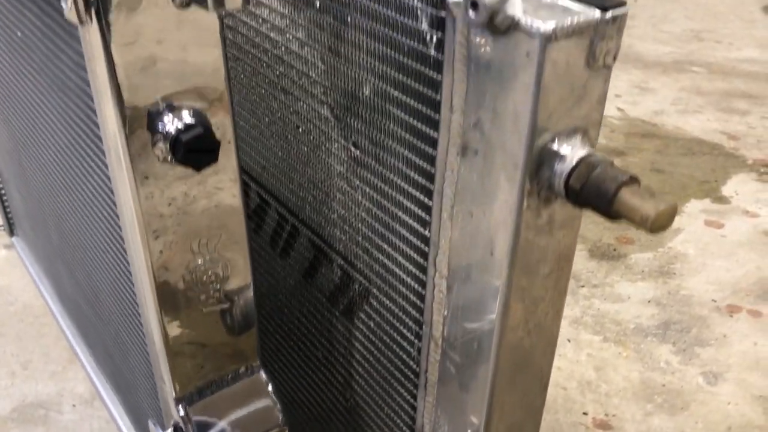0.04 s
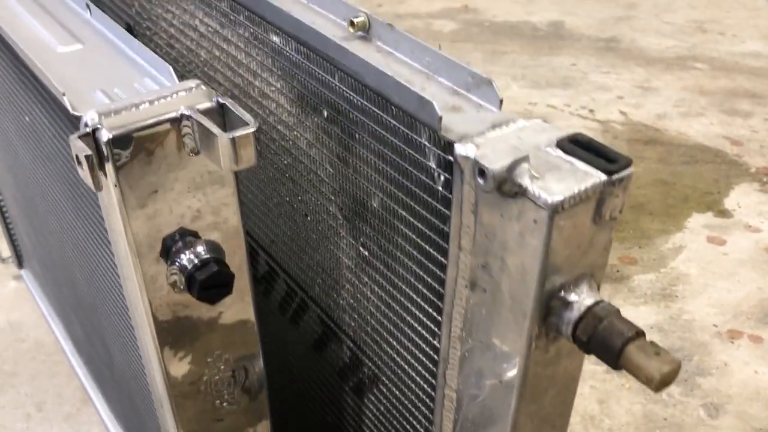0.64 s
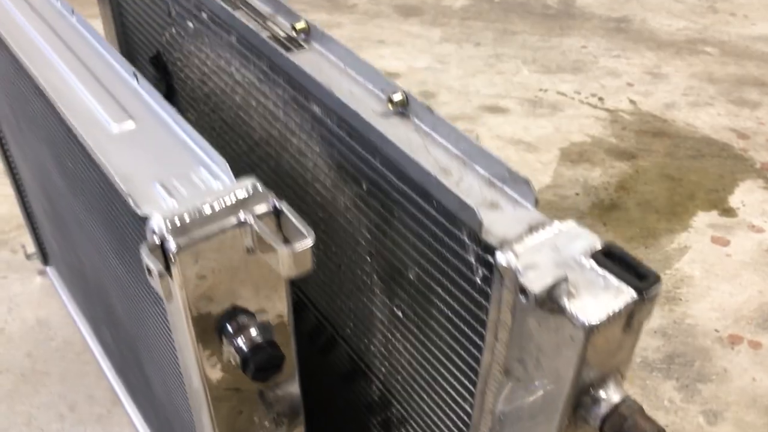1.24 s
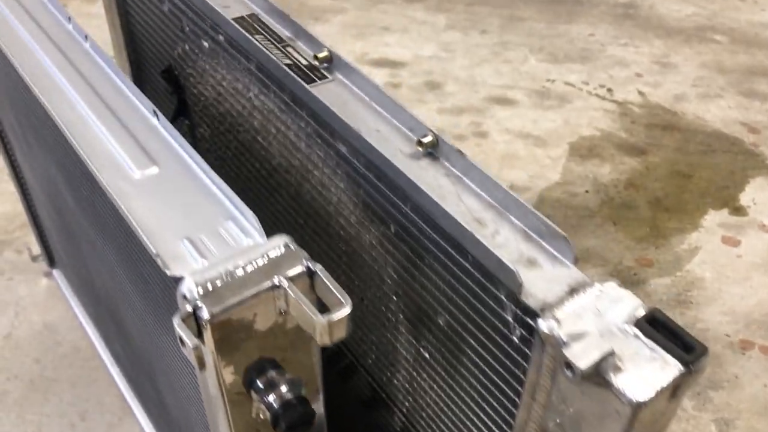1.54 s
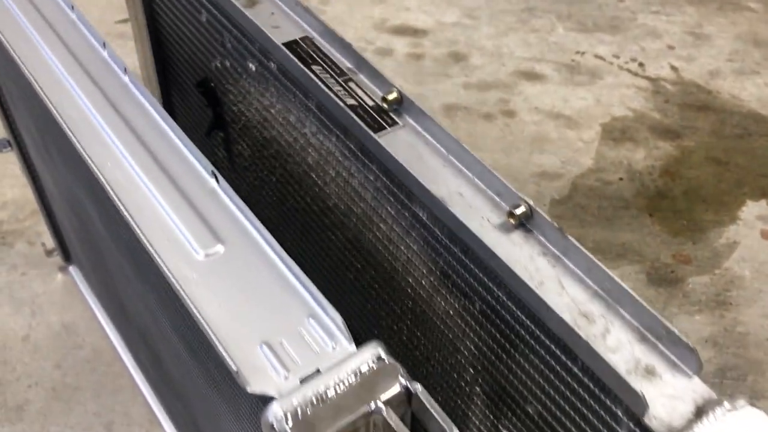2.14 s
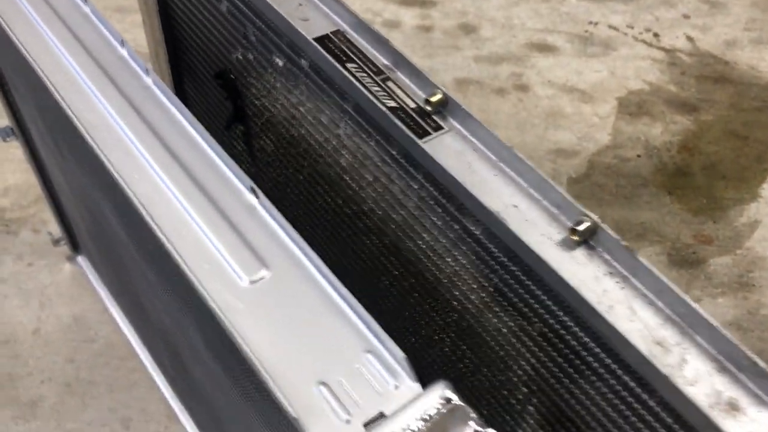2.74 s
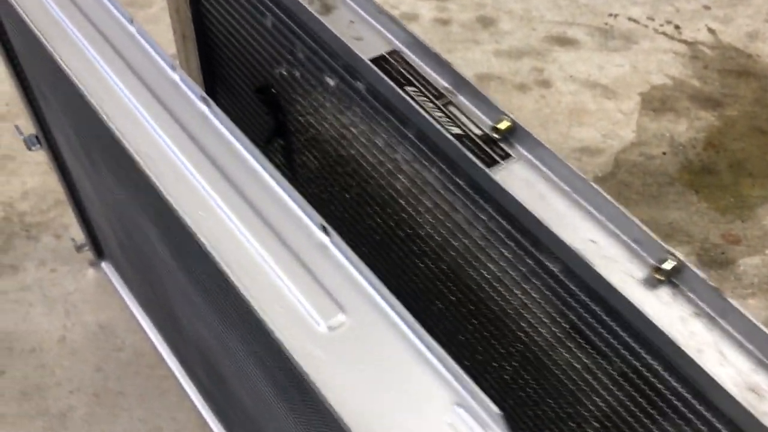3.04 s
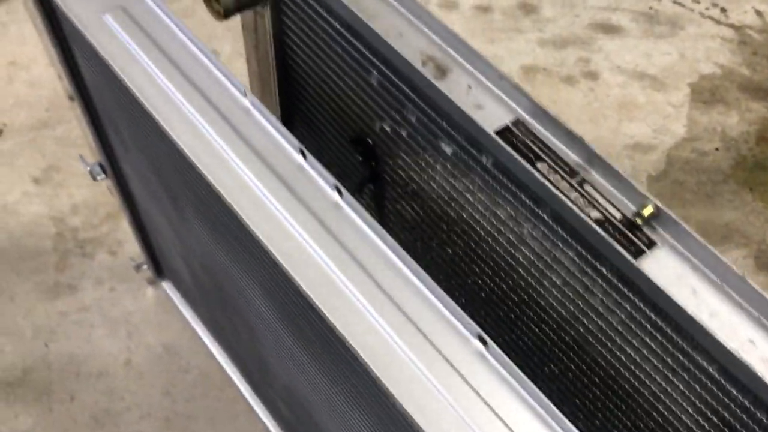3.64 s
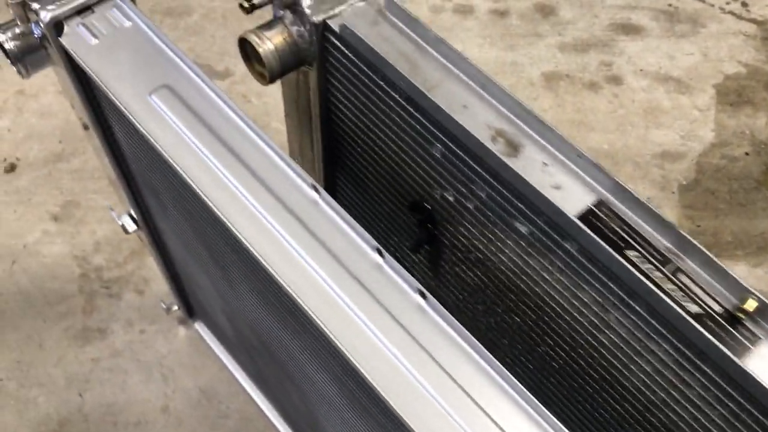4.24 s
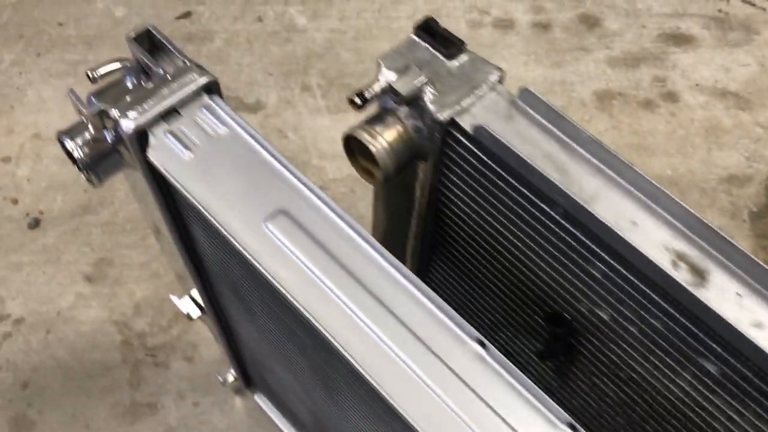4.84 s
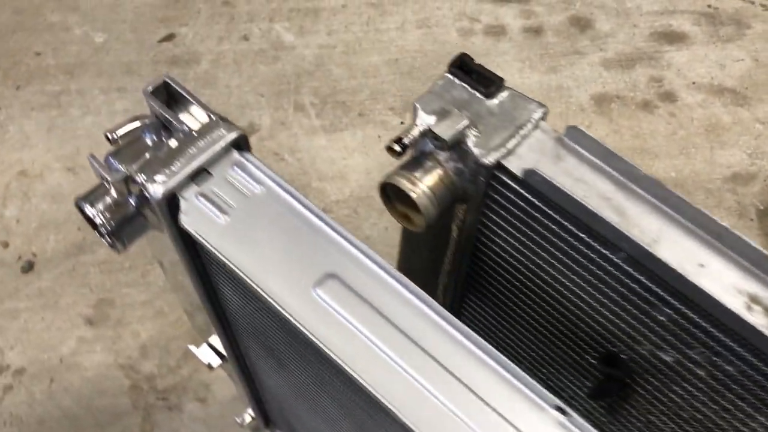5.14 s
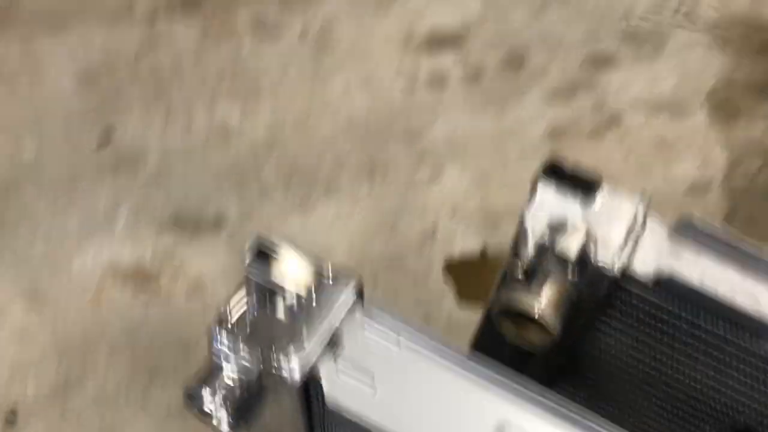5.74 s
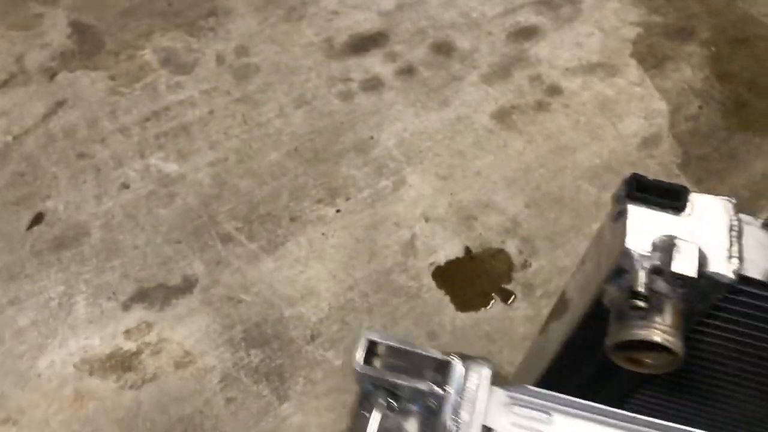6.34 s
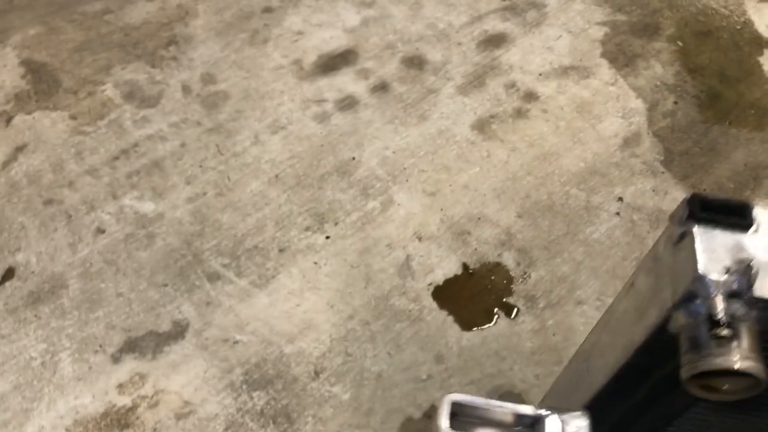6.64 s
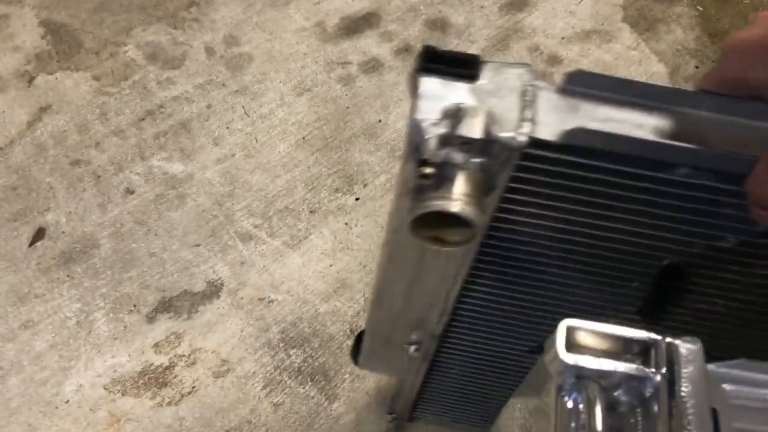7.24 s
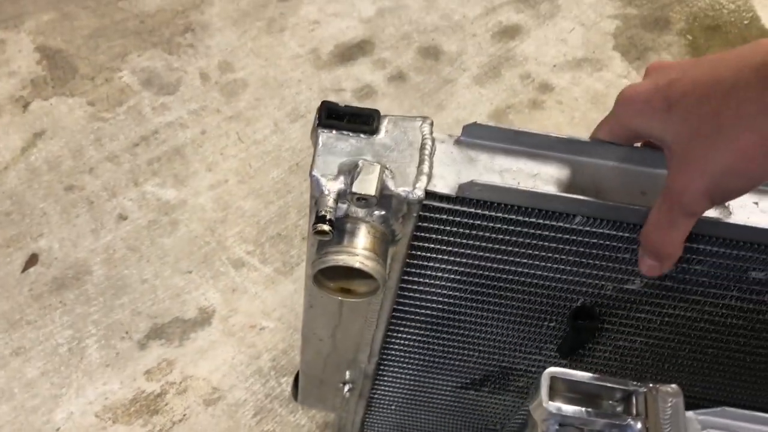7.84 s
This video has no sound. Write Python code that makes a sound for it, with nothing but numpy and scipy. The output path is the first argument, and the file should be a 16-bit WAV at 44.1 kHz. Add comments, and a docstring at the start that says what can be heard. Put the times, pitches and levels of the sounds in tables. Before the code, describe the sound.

A quiet garage with soft air noise, a faint low hum and a short echo, heard from close by. From the start, slow steps rub and scuff lightly on gritty concrete, and single grains of sand crack underfoot in sharp, irregular ticks. A clearer scuff comes at about 1.5 seconds, a few soft, dull taps around 2.8 and 3.2, and the sharpest snap near 4. The shuffling gets busier from 4.4 seconds, and at 5.8 a heel lands with a dull thud, a gritty skid and a slight microphone rumble. At about 6.4 a light nudge draws a faint note from an aluminium radiator. From 6.8 it is dragged over the concrete in a louder, grinding scrape that sticks and slips, with a hollow metallic ring, strongest around 7 to 7.3. It settles with a low shudder from 7.5 and fades by 7.9 seconds.

```python
"""A bare garage with a gritty concrete floor. Someone steps slowly around two aluminium radiators.
Soles rub and scuff, single grains of sand crack under them, and the room answers each sound.
Then one radiator is dragged: its edge sticks and slips on the concrete, which makes its tanks and
its core (the finned middle) ring, and it settles with a low shudder."""
import sys
import numpy as np
from scipy import signal
from scipy.fft import rfft, irfft, next_fast_len
from scipy.io import wavfile
from scipy.ndimage import uniform_filter1d

SR = 44100
rng = np.random.default_rng(int(sys.argv[2]) if len(sys.argv) > 2 else 0)


def transcribe(signal):
    """Save signal, clipped to [-1, 1], as a 16-bit WAV file at the path in sys.argv[1]."""
    frames = np.atleast_2d(signal).T
    limited = np.clip(frames, -1, 1)
    pcm = np.round(limited * 32767).astype(np.int16)
    wavfile.write(sys.argv[1], SR, pcm)


N = 347508

# which part of the radiator rings in which range of pitch
PANEL_HZ, CORE_HZ, TANK_HZ, RIM_HZ = (0, 330), (330, 1000), (1000, 2500), (2500, SR / 2)

# the edge digs into the concrete: t/s, length/s, level/dB
EDGE_BITES = [(6.95, 0.033, -33), (7.06, .15, -43.5), (7.24, .19, -45), (7.515, 0.037, -43),
              (7.61, 0.026, -49.5), (7.69, 0.026, -49)]
# tone of the grinding edge: f/Hz, level/dB
GRIND_TONE = [(300, -15), (900, 3.5), (1500, -0.5), (2700, 5.5), (4200, 3), (5000, -6), (6500, -1),
              (7800, -11.5), (10500, -16.5), (14000, -15), (16000, -22)]
def radiator():
    """The edge sticks and slips, grinding the concrete and shaking the core, tanks and rim."""
    friction = even(grains(per_s=2500, spread_db=2.5, clump_db=1.5, clumps_per_s=160), span_s=0.035)
    dig, = pushes(EDGE_BITES, attack_s=0.0064, release_s=0.03)
    jolts = slips()
    nudge = swell(start=6.41, length=0.1, attack_s=0.038, release_s=0.038)
    core = core_ring(friction, nudge)
    tanks = tank_ring(friction, dig, jolts)
    # the first light push makes one note of a tank sing
    note = resonate(resonate(friction, hz=1090, width_hz=7.3), hz=1090, width_hz=22)
    sing = from_db(-57) * nudge * even(note, span_s=0.03)
    bite = dragging(-15) + dig + jolts
    rim = from_db(-13) * through(bite * friction, ringing(RIM_HZ))
    edge = bite * colour(friction, GRIND_TONE) + rim
    echo = from_db(-7.5) * garage(edge + from_db(-12.5) * tanks)
    return core + tanks + sing + edge + echo


# speed of the drag, given as how loud it rubs: t/s, level/dB
DRAG_SPEED = [(6.72, -74), (6.76, -42.5), (6.84, -32.5), (7.04, -32.5), (7.16, -27.5), (7.25, -33),
              (7.42, -37.5), (7.73, -48.5), (7.79, -63.5), (7.88, -71)]
def dragging(offset_db):
    """A faster drag is louder: a volume curve that follows the speed, shifted by offset_db."""
    return from_db(offset_db + np.interp(np.arange(N) / SR, *np.transpose(DRAG_SPEED), left=-np.inf))


# the edge catches and breaks free: t/s, relative level/dB
EDGE_SLIPS = [(6.419, -29.5), (6.832, -28), (6.878, -36), (7.069, -41), (7.095, -17), (7.155, -22),
              (7.347, -24), (7.358, -33), (7.516, -24), (7.537, -19), (7.613, -20)]
def slips(attack_s=0.0024, decay_s=0.004):
    """Each slip is a short surge of friction; returns their volume curve."""
    out, t = np.zeros(N), np.arange(SR // 10) / SR
    for start, db in EDGE_SLIPS:
        add(out, start, from_db(db - 14) * np.minimum(t / attack_s, 1) * np.exp(-t / decay_s))
    return out


def core_ring(friction, nudge, lower_at_s=7.056, lowering_s=0.58, lifted_db=-13):
    """As the radiator is lowered, its weight moves the shaking into the core."""
    load = np.clip((np.arange(N) / SR - lower_at_s) / lowering_s, 0, 1)
    flex = dragging(lifted_db * (1 - load)) + from_db(-62) * nudge
    return flex * even(sliding_notes(friction, CORE_HZ, wander_per_s=9), span_s=0.055)


def tank_ring(friction, dig, jolts):
    """The hollow tanks ring as the edge slides and digs, and ring on after each slip."""
    drive = from_db(-1.5) * (dragging(0) + from_db(-5) * dig)
    notes = sliding_notes(friction, TANK_HZ, wander_per_s=14)
    # the many weak notes between the strong ones blur into a rasp
    rasp = rms_one(resonate(above(friction, hz=1050), hz=1650, width_hz=1800))
    clangs = from_db(-2) * through(friction * jolts, ringing(TANK_HZ))
    return drive * even(notes + from_db(-21) * rasp, span_s=0.041) + clangs


# the radiator's natural notes (narrow ones ring longer): f/Hz, width/Hz, level/dB
METAL_NOTES = [(168, 14, -13), (211, 14, -7), (268, 20, -15), (372, 20, -10.5), (537, 12, -3),
               (562, 12, -4.5), (625, 24, -7), (665, 14, -4), (840, 20, -17), (910, 20, -18),
               (1098, 15, 2.5), (1135, 22, -6), (1210, 26, 2.5), (1394, 20, -1), (1530, 45, -10),
               (1640, 22, 1), (1745, 15, -1), (1792, 30, -5), (1846, 15, -7), (1949, 15, -4),
               (2195, 17, -6), (2320, 25, -12), (2817, 32, -8), (3090, 40, -13), (3456, 22, -10),
               (4180, 50, -14), (5650, 400, -23)]
def sliding_notes(friction, band, wander_per_s, wander_db=3.5):
    """As the contact slides along the edge, each note is driven now more, now less."""
    return rms_one(sum((-1) ** k * from_db(db + wander_db * drift(wander_per_s))
                       * resonate(friction, hz, width)
                       for k, (hz, width, db) in enumerate(METAL_NOTES) if band[0] <= hz < band[1]))


def ringing(band):
    """How the notes in one range of pitch die away after a single knock."""
    t = np.arange(SR // 2) / SR
    return sum((-1) ** k * from_db(db) * width * np.exp(-np.pi * width * t) * np.sin(2 * np.pi * hz * t)
               for k, (hz, width, db) in enumerate(METAL_NOTES) if band[0] <= hz < band[1])


# the radiator rocks on its feet: t/s, length/s, boom level/dB, drone level/dB
BODY_ROCKS = [(6.95, 0.025, -60, -52), (7.28, 0.091, -55, -58), (7.38, 0.084, -71, -51),
              (7.51, 0.035, -49, -43.5), (7.585, 0.056, -45, -43.5), (7.67, 0.15, -49, -56)]
# tone of a deep boom: f/Hz, level/dB
BOOM_TONE = [(30, -14), (42, -25), (53, 13), (66, -5), (95, 2), (120, -9.5)]
def shudder():
    """The whole body booms and its broad panels drone as it slides and rocks."""
    boom, drone = pushes(BODY_ROCKS, attack_s=0.015, release_s=0.029)
    body = even(colour(rng.standard_normal(N), BOOM_TONE), span_s=0.11)
    panels = even(through(rng.standard_normal(N), ringing(PANEL_HZ)), span_s=0.054)
    return (boom + dragging(-26)) * body + (drone + dragging(-24.5)) * panels


# a sole rubs the floor: t/s, length/s, relative grit level/dB, relative sand level/dB
SOLE_RUBS = [(.15, 0.09, -86, -72), (.3, 0.13, -78, -70), (.66, 0.14, -68.5, -73), (.98, .1, -69, -58.5),
             (1.07, 0.055, -60, -55.5), (1.49, 0.29, -59, -64), (1.75, 0.25, -71, -73),
             (2.24, 0.092, -75.5, -73.5), (2.46, 0.083, -66, -63.5), (2.98, 0.061, -69, -59),
             (3.04, 0.084, -60.5, -57.5), (3.16, 0.36, -62, -64.5), (3.52, .1, -62.5, -61),
             (3.62, 0.18, -61.5, -53), (3.82, 0.075, -72, -73), (4.4, 0.21, -56.5, -60),
             (4.62, 0.21, -54, -58.5), (5.09, 0.25, -69.5, -66), (5.33, .11, -55, -56.5),
             (5.5, .14, -57.5, -63.5), (5.65, 0.19, -54, -50), (5.77, 0.22, -55, -56),
             (6.27, 0.14, -56.5, -59.5), (6.41, 0.14, -51, -60.5), (6.58, 0.095, -59.5, -65.5),
             (6.68, 0.1, -59, -56.5)]
# tone of coarse grit: f/Hz, level/dB
GRIT_TONE = [(200, 0), (400, -7.5), (600, -1.5), (850, -3), (1300, -2), (2500, 0.5), (3800, -1),
             (5000, -7.5), (7000, -11.5)]
# tone of fine sand: f/Hz, level/dB
SAND_TONE = [(4200, -2), (6300, -3.5), (8800, -3), (10400, -9), (12500, -6.5), (14500, -8.5),
             (16000, -14.5)]
def soles():
    """Coarse grit rolls under the soles while fine sand hisses; now and then a grain ticks alone."""
    grit, sand = pushes(SOLE_RUBS, attack_s=0.026, release_s=0.046)
    grit, sand = grit + from_db(-72.5), sand + from_db(-73.5)   # the feet are never quite still
    coarse = colour(grains(per_s=3000, spread_db=5.5, clump_db=2.5, clumps_per_s=130), GRIT_TONE)
    fine = colour(grains(per_s=6000, spread_db=6, clump_db=1.5, clumps_per_s=220), SAND_TONE)
    ticks = 0
    for hz in np.geomspace(1500, 11000, 4):
        strays = grains(per_s=22, spread_db=-5, clump_db=1, clumps_per_s=12)
        ticks += rms_one(resonate(strays, hz, 0.17 * hz))
    crunch = even(coarse, span_s=0.062) + from_db(-13) * ticks
    return from_db(-3.5) * (grit * crunch + sand * even(fine, span_s=0.047))


# short skids of a sole: t/s, length/s, level/dB, strongest f/Hz
SOLE_SKIDS = [(0.165, 0.02, -61, 7000), (0.394, 0.017, -61.5, 3720), (1.105, 0.018, -48, 4000),
              (1.479, 0.011, -47, 3200), (1.485, 0.0095, -41, 1910), (1.502, 0.019, -44.5, 5500),
              (2.975, 0.0075, -52, 7000), (3.44, 0.027, -53.5, 2140), (4.398, 0.0063, -49, 2880),
              (4.489, 0.03, -47.5, 5140), (5.255, 0.0038, -40.5, 2600), (5.265, 0.046, -52, 2760),
              (5.768, 0.021, -42.5, 7000), (5.789, 0.1, -46.5, 2900), (5.914, 0.022, -47, 9000),
              (6.264, 0.026, -49, 10000), (6.948, 0.075, -35, 4170)]
def skids(attack_s=0.0028, release_s=0.0064):
    """A sole slides briefly and crushes many grains at once."""
    out, t = np.zeros(N), np.arange(SR // 6) / SR
    crush = above(grains(per_s=12000, spread_db=3.5, clump_db=12.5, clumps_per_s=190), hz=534)
    for start, length, db, hz in SOLE_SKIDS:
        grit, width = crush[round(start * SR):][:len(t)], 1.7 * hz
        pressure = np.minimum(t / attack_s, 1) * np.exp(-np.maximum(t - length, 0) / release_s)
        rasp = resonate(resonate(grit, hz, width), hz, 2 * width)
        add(out, start, from_db(db) * pressure * even(rasp + from_db(-18) * grit, span_s=0.0079))
    return out


# larger sand grains crack: t/s, peak level/dB, f/Hz, width as a share of f
SAND_CRACKS = [(.108, -44, 3820, .5), (.655, -42.5, 5370, .6), (.69, -51, 1450, 0.37),
               (.969, -35, 3500, 0.59), (1.02, -36, 4630, 0.6), (1.211, -35, 7500, .65),
               (1.277, -39, 3500, 4.4), (1.426, -50.5, 1530, 0.11), (1.519, -29, 6500, 0.61),
               (1.692, -31.5, 4300, .8), (1.7177, -32, 2500, 1.2), (1.743, -36.5, 2780, 1),
               (1.833, -35.5, 3170, 0.41), (1.86, -27.5, 3600, .65), (1.968, -34.5, 2840, .8),
               (2.142, -24, 3600, 0.82), (2.264, -38.5, 2980, .8), (2.439, -38.5, 4080, .5),
               (2.4819, -29, 4020, 0.71), (2.703, -42.5, 4200, 0.59), (3.095, -32.5, 3730, 3.9),
               (3.142, -31.5, 2000, 4), (3.314, -27.5, 3020, 5), (3.383, -38, 1650, 1.7),
               (3.395, -40, 1560, 0.95), (3.428, -37.5, 4020, .5), (3.46, -24.5, 2800, 1.9),
               (3.689, -25, 3100, 0.91), (3.816, -37, 3550, 0.37), (3.894, -38, 3500, 0.73),
               (3.967, -18.5, 6070, 0.43), (4.279, -46.5, 3420, .12), (4.732, -27, 3160, 1.5),
               (4.78, -31.5, 2920, .5), (4.822, -28.5, 3170, 0.46), (5.039, -36, 5000, 2.2),
               (5.055, -42.5, 2960, .11), (5.075, -38, 3580, .5), (5.113, -35, 3050, 0.26),
               (5.435, -34, 5400, 0.83), (5.538, -27.5, 3360, 2.8), (5.649, -28, 3600, 1.2),
               (5.666, -27.5, 3150, 0.37), (5.727, -32, 2430, .25), (5.802, -21, 3650, .4),
               (5.922, -29.5, 3470, .9), (6.616, -35, 3170, 0.35)]
def cracks(crumble_s=0.0023, crumble_db=-23):
    """A grain bursts with one sharp snap and faint crumbs follow; returns snaps and crumbs."""
    out, t = np.zeros((2, N)), np.arange(SR // 80) / SR
    for start, db, hz, share in SAND_CRACKS:
        crumbs = from_db(crumble_db) * rng.standard_normal(len(t)) * np.exp(-t / crumble_s)
        burst = above(resonate(np.array([t == 0, crumbs]), hz, share * hz), hz=820)
        # a bigger grain breaks more slowly, which sounds duller
        burst = signal.lfilter(*signal.butter(1, min(1.32 * hz, SR / 3), fs=SR), burst)
        for track, part in zip(out, burst / np.abs(burst[0]).max()):
            add(track, start, from_db(db) * part)
    return out


# soft taps close by: t/s, relative level/dB, f/Hz above which they are muffled
SOFT_TAPS = [(2.779, -31.5, 3240), (2.786, -38.5, 1520), (2.8447, -47, 1210), (3.195, -47.5, 2030),
             (3.26, -44, 1550), (5.405, -47, 1500), (5.546, -50, 1800)]
def taps(decay_s=0.0043, turns=1.02, onset_s=0.00016):
    """Dull taps on a hollow body; the highs arrive first, so each falls quickly in pitch."""
    out, t = np.zeros(N), np.arange(SR // 30) / SR
    sweep = -np.sin(2 * np.pi * turns * np.log1p(t / onset_s)) * np.exp(-t / decay_s)
    for start, db, hz in SOFT_TAPS:
        add(out, start, from_db(db) * signal.lfilter(*signal.butter(2, hz, fs=SR), above(sweep, hz=104)))
    hollow_ring = from_db(3) * resonate(out, hz=1550, width_hz=66)
    return out + hollow_ring


def heavy_step(start=5.805, thud_hz=165):
    """A heel comes down with a dull thud, and a low rumble of the microphone being moved follows."""
    thud = resonate(resonate(rng.standard_normal(N), thud_hz, width_hz=150), thud_hz, width_hz=300)
    rumble = colour(rng.standard_normal(N), BOOM_TONE)
    heel = from_db(-52.5) * swell(start, length=0.026, attack_s=0.014, release_s=0.02)
    mic_handling = from_db(-62) * swell(start, length=0.4, attack_s=0.05, release_s=0.08)
    return heel * even(thud, span_s=0.03) + mic_handling * even(rumble, span_s=0.1)


# how long the room rings: f/Hz, t/s to fade by 60 dB
ECHO_TIMES = [(150, 0.12), (600, 0.21), (1500, 0.47), (3500, 0.5), (8000, 0.31), (15000, 0.36)]
def garage(x, build_s=0.023):
    """Echoes off the bare walls build into a blur, then each range of pitch fades at its own pace."""
    t = np.arange(SR * 3 // 4) / SR
    white, tail = rng.standard_normal((2, len(t))), 0
    edges_hz = 90 * 2 ** np.arange(0, 7.6, 0.5)
    for k, (low, high) in enumerate(zip(edges_hz, edges_hz[1:])):
        band = signal.sosfilt(signal.butter(2, [low, high], "band", fs=SR, output="sos"), white[k % 2])
        tail += band * np.exp(-np.log(1000) * t / at_hz(ECHO_TIMES, np.sqrt(low * high)))
    return through(x, tail * np.clip(t / build_s, 0, 1))


# tone of the air in the room: f/Hz, level/dB
AIR_TONE = [(25, -18), (40, -24), (60, -4.5), (92, 4), (150, -7), (280, -12), (700, -20.5), (1500, -19),
            (2600, -30), (4200, -24), (7000, -29), (10500, -35.5), (13000, -29.5), (16000, -44)]
def room_tone(hum_hz=55.1):
    """Soft air noise with a low, unsteady hum."""
    hum = resonate(resonate(rng.standard_normal(N), hum_hz, width_hz=13), hum_hz, width_hz=22)
    return from_db(-66.5) * colour(rng.standard_normal(N), AIR_TONE) + from_db(-64.5) * rms_one(hum)


def grains(per_s, spread_db, clump_db, clumps_per_s):
    """Tiny breaks: random clicks of uneven size that grow louder and softer in clumps."""
    sizes = from_db(spread_db * np.minimum(rng.exponential(1, N), 4)) * rng.choice([-1, 1], N)
    breaks = rng.random(N) < per_s / SR
    return rms_one(sizes * breaks * from_db(clump_db * drift(clumps_per_s)))


def drift(per_s):
    """A curve that wanders to a new random value per_s times a second."""
    knots = rng.standard_normal(N // 20)
    return rms_one(np.interp(np.arange(N) * per_s / SR, np.arange(len(knots)), knots))


def swell(start, length, attack_s, release_s):
    """Volume curve of one push: rise, hold, die away."""
    t = np.arange(N) / SR - start
    return np.clip(t / attack_s, 0, 1) * np.exp(-np.clip((t - length) / release_s, 0, 20))


def pushes(rows, attack_s, release_s):
    """One volume curve for each level column in a table of pushes."""
    return sum(np.outer(from_db(levels), swell(start, length, attack_s, release_s))
               for start, length, *levels in rows)


def from_db(db):
    """Turn decibels into a multiplier."""
    return 10 ** (np.asarray(db) / 20)


def rms_one(x):
    """Scale x so its average strength (rms) is 1."""
    return x / np.sqrt(np.mean(x ** 2) + 1e-20)


def even(x, span_s):
    """Hold the strength at 1 and keep only the roughness faster than span_s."""
    return x / np.sqrt(np.maximum(uniform_filter1d(x * x, max(int(span_s * SR), 3)), 1e-6))


def at_hz(points, hz):
    """Read between a table's rows, with octaves evenly spaced."""
    freqs, values = np.transpose(points)
    return np.interp(np.log(hz + 1e-3), np.log(freqs), values)


def colour(x, tone):
    """Shape x with a tone table, fading beyond its ends; strength 1."""
    size = next_fast_len(N)
    hz = np.arange(size // 2 + 1) * SR / size
    skirts = np.minimum(hz / tone[0][0], 1) ** 2 * np.minimum(tone[-1][0] / (hz + 1), 1) ** 2
    return rms_one(irfft(rfft(x, size) * from_db(at_hz(tone, hz)) * skirts, size)[:N])


def resonate(x, hz, width_hz):
    """Let through the part of x near one pitch."""
    hz, width_hz = min(hz, SR / 3), min(width_hz, SR / 3)
    return signal.lfilter(*signal.iirpeak(hz, hz / width_hz, fs=SR), x)


def above(x, hz):
    """Let through the part of x above hz."""
    return signal.sosfilt(signal.butter(2, hz, "high", fs=SR, output="sos"), x)


def through(x, response):
    """Make x ring like a body or room that answers one knock with this response."""
    return signal.fftconvolve(x, response / np.linalg.norm(response))[:N]


def add(out, start_s, sound):
    """Mix a sound in at start_s."""
    start = max(round(start_s * SR), 0)
    out[start:start + len(sound)] += sound[:max(N - start, 0)]


def scene():
    """Feet and radiator in the garage, in one channel."""
    rubbing = soles() + skids()
    snaps, crumbs = cracks()
    echo = from_db(-7.5) * garage(rubbing + snaps)
    floor = rubbing + snaps + crumbs + echo
    return (floor + taps() + heavy_step() + radiator() + shudder() + room_tone())[None]


def record(dry, low_hz=40, high_hz=16000):
    """Cut away the deepest bass and the highest treble."""
    thin = signal.sosfilt(signal.butter(5, low_hz, "high", fs=SR, output="sos"), dry)
    return signal.sosfilt(signal.ellip(10, 0.1, 80, high_hz, fs=SR, output="sos"), thin)


dry = scene()
out = record(dry)
transcribe(out)
```